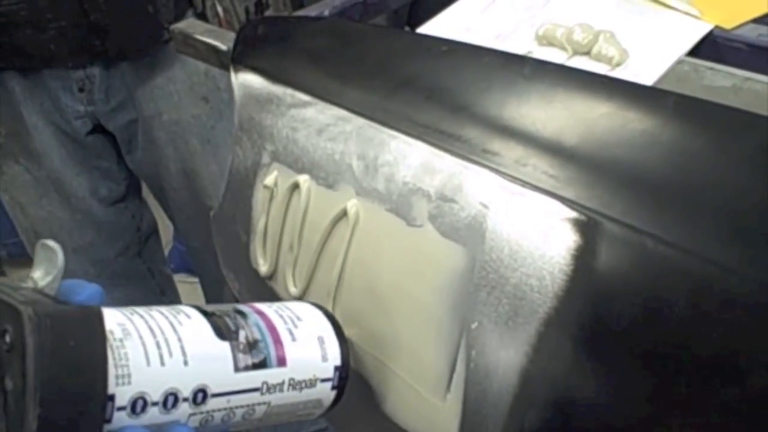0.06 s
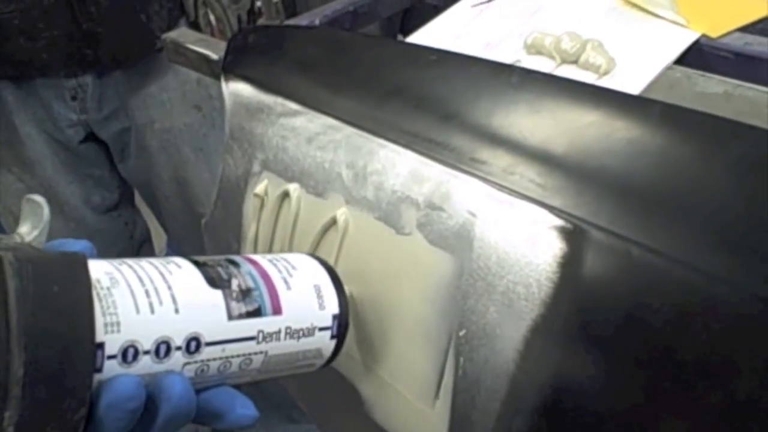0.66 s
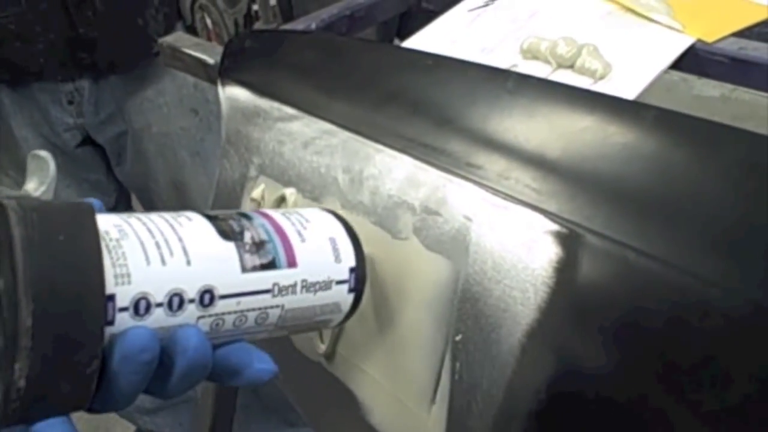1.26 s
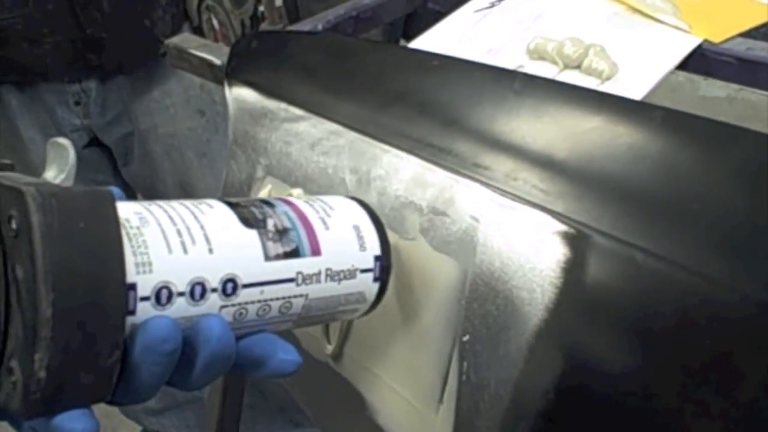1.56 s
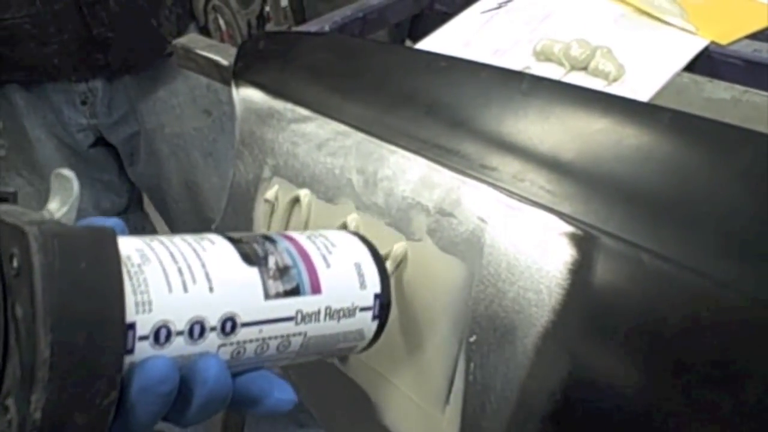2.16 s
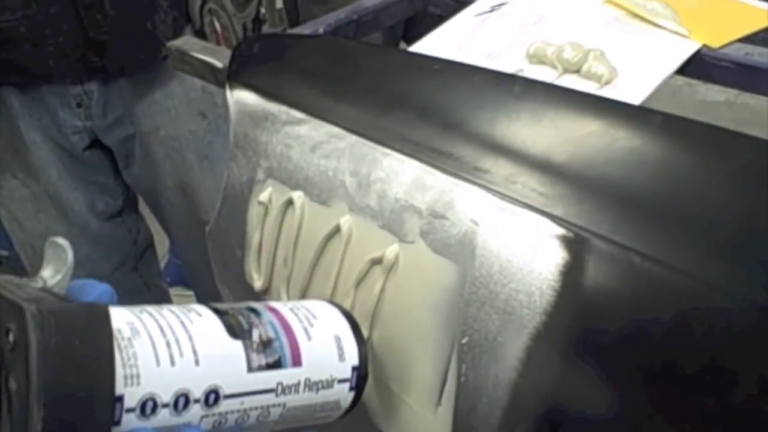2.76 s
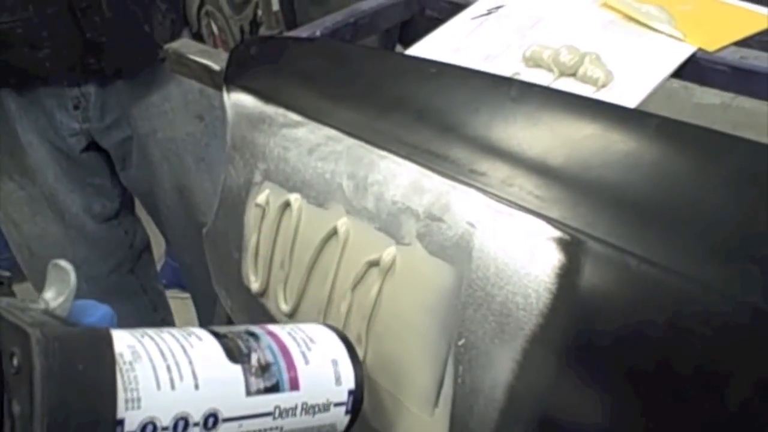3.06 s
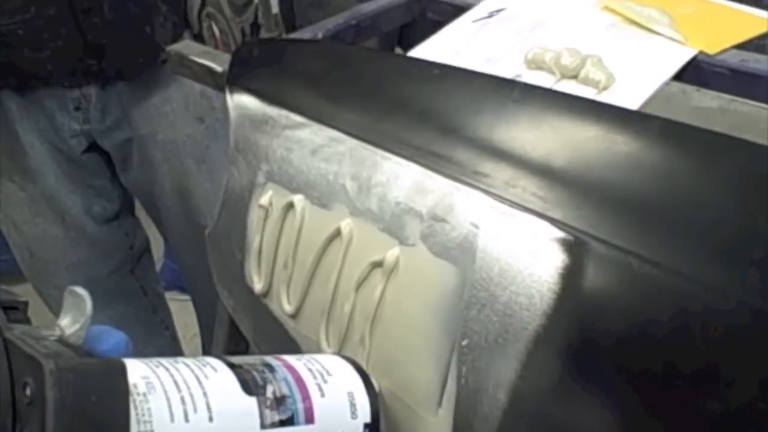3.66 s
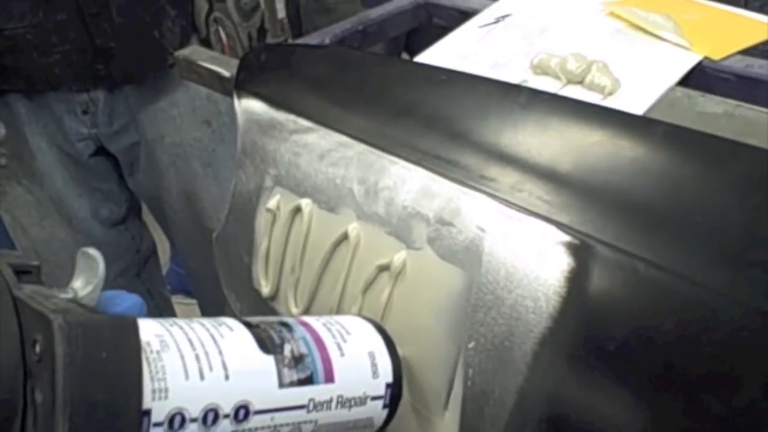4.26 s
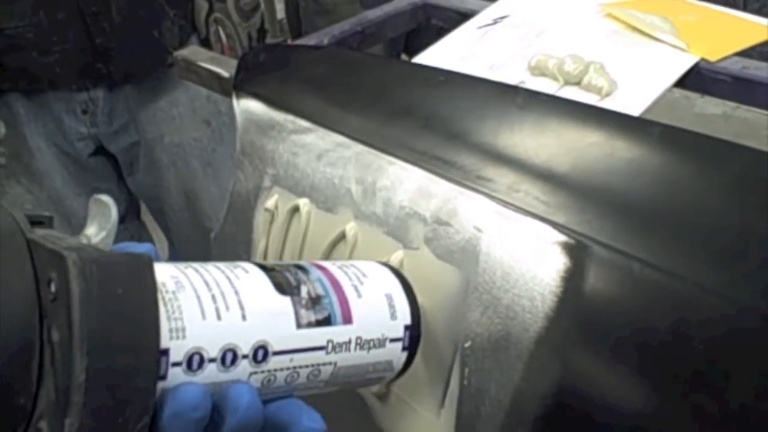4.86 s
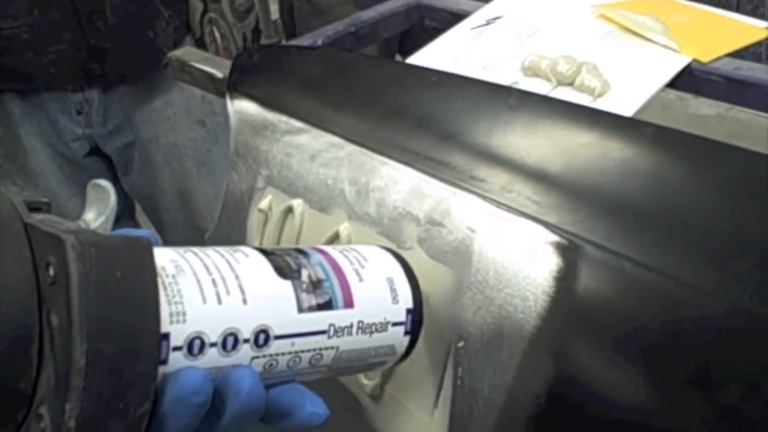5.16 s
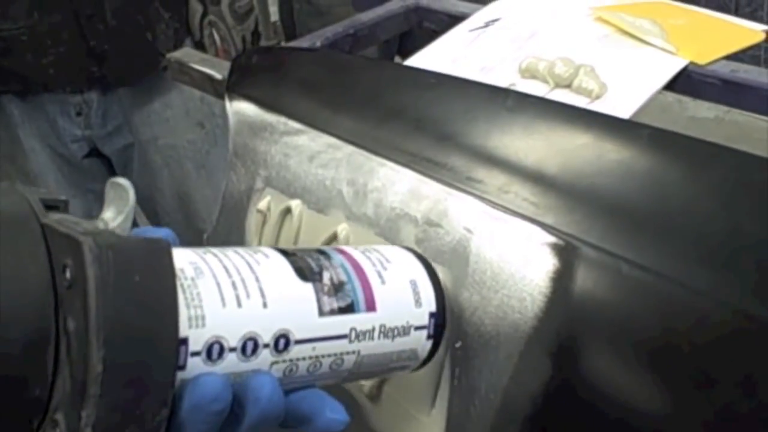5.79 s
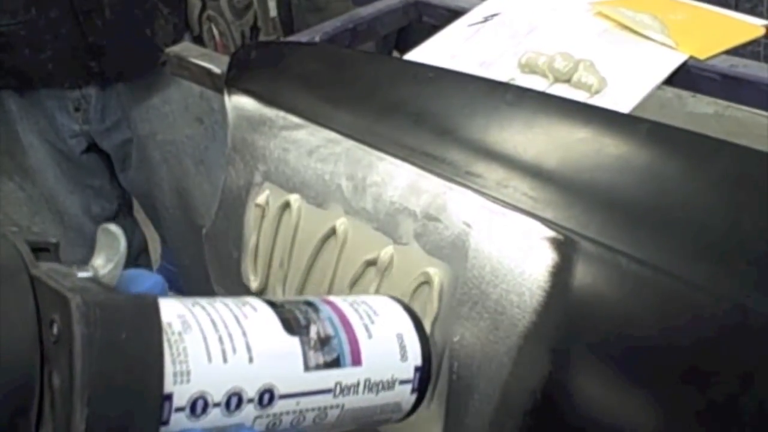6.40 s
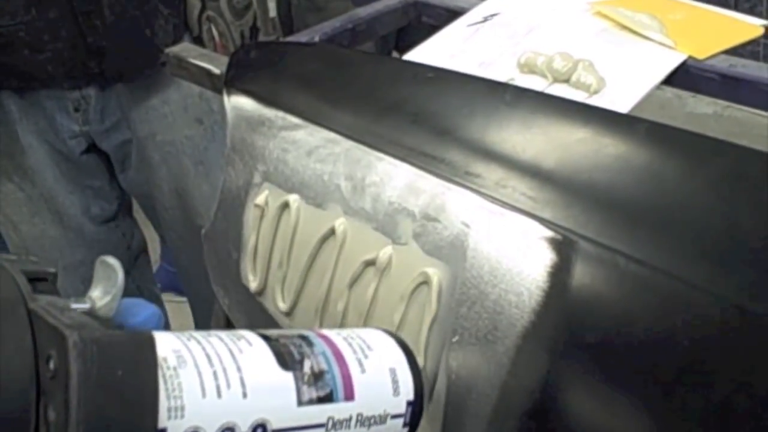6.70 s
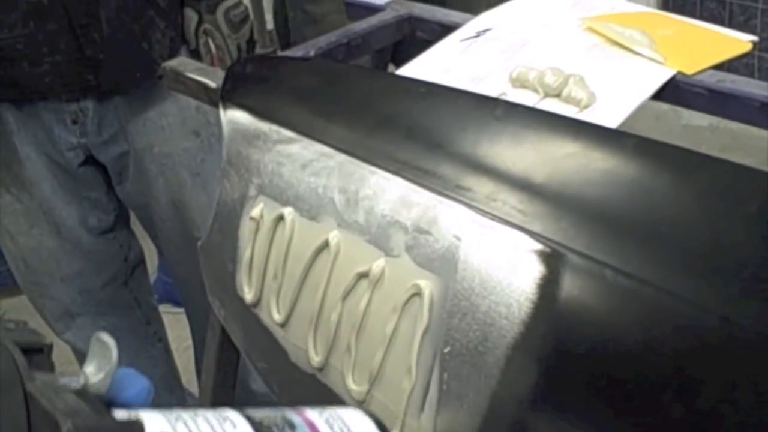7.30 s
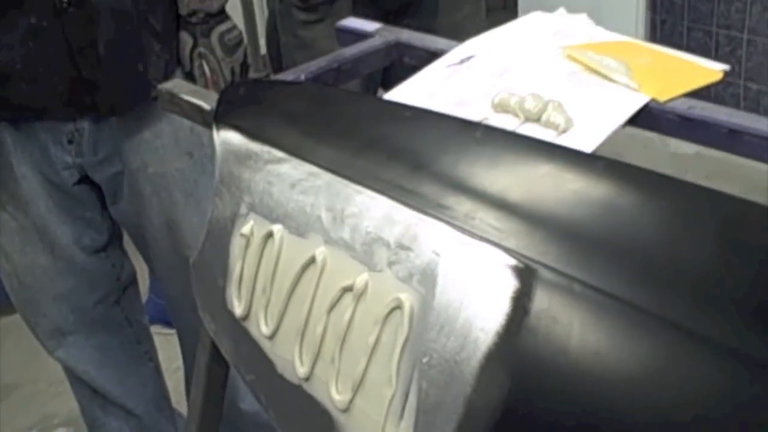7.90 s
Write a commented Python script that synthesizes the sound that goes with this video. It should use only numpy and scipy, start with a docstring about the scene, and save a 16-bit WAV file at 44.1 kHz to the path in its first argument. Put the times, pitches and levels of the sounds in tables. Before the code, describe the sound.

A close, continuous rush of air and an even whine come from a pneumatic gun spreading filler on a car panel. The tone of the hiss changes gently as the tool moves. After about seven seconds it shuts off with a thump, a short vent of air and a quick falling rattle, leaving a faint bump of a hand and the quiet background of a workshop.

```python
"""A bright, steady hiss with a whine inside it: an air-powered filler gun, close by, sweeping a car panel.
The hiss is exhaust air, changing colour as the gun turns; the whine is its vane motor and reduction gear.
Near the end the trigger is let go: the valve thumps shut, trapped air escapes and the vanes rattle
and hum as they spin down. One soft thump of the hand follows, over the quiet tone of the workshop."""
import sys
import numpy as np
from scipy import signal
from scipy.fft import rfft, irfft
from scipy.io import wavfile
from scipy.ndimage import uniform_filter1d

SR = 44100
rng = np.random.default_rng(int(sys.argv[2]) if len(sys.argv) > 2 else 0)


def log_audio(samples):
    """Write samples as a 16-bit WAV file to the path given in sys.argv[1]."""
    # one column per channel
    frames = np.atleast_2d(samples).T
    # limit to full scale, then quantise
    limited = np.clip(frames, -1, 1)
    pcm = np.round(limited * 32767).astype(np.int16)
    wavfile.write(sys.argv[1], SR, pcm)


N = 350152
TIME = np.arange(N) / SR
BINS = np.fft.rfftfreq(2048, 1 / SR)  # Hz
FRAMES = np.arange(N // 512 + 3) * 512 / SR  # seconds

# The gun's path over the panel. Each row: time in seconds, lift (negative is low, positive high),
# reach (negative is left, positive right).
GUN_PATH = [(0, -0.69, -2.6), (.3, -0.63, -2.4), (1, -0.093, -2.1), (1.4, 0.74, -0.59), (1.8, 1, 0.47),
            (2.3, 0.5, -0.56), (2.7, -.4, -0.17), (3.1, -0.94, -1.05), (3.8, -0.82, -0.32),
            (4.1, -0.47, 0.33), (4.6, 0.071, 1), (5, 0.47, 0.67), (5.8, 0.7, 0.92), (6.3, .25, 0.98),
            (6.9, -0.5, 0.96), (7.4, -0.78, 0.41)]
VANE_ORDER = 40  # air puffs per turn of the output shaft
RELEASE_S, SHUT_S = 7.388, 7.424  # the trigger is let go, then the valve snaps shut


def exhaust(turns, air_db=-15.5, vent_db=-21.5, split_hz=4500):
    """Turbulent air hisses out, throbbing with each shaft turn; trapped air vents once the valve shuts."""
    air = amp(air_db) * air_flow() + after_shut(vent_db, t60_s=.17, rise_s=.004, bend=1.23)
    jet = coloured_noise(exhaust_colour())
    body = signal.sosfiltfilt(signal.butter(2, split_hz, fs=SR, output='sos'), jet)
    gear_ripple = .055 * np.sin(2 * np.pi * 42 * turns)  # the teeth ripple the body of the hiss
    flutter = .07 * band_noise(590, 32)  # the lowest pipe resonance shakes the treble
    sizzle = (jet - body) * (1 + flutter + .13 * spits())
    hiss = body * (1 + gear_ripple) + sizzle
    throb = .051 * sum(np.cos(2 * np.pi * (k * turns + rng.random())) / np.sqrt(k) for k in range(1, 6))
    gusts = .046 * band_noise(0, 45)
    return air * hiss * (1 + throb + gusts)


def exhaust_colour(ripple_db=1.1):
    """The jet's spectrum, frame by frame, through resonances that swell and fade as the gun turns."""
    # The bare jet. Each row: frequency in Hz, relative level in dB.
    jet_spectrum = [(15, -86), (38, -67.5), (60, -79), (150, -75.5), (420, -73), (525, -69.5), (565, -63.5),
                    (1000, -64.5), (1400, -56), (3000, -56.5), (8000, -59), (14000, -61), (15600, -63.5)]
    # Peaks and dips of the housing and the panel beside it. Each row: centre in Hz, half width in Hz,
    # gain in dB, added dB per unit of lift, added dB per unit of reach.
    resonances = [(586, 14, 6, 1, 1.4), (784, 26, -1, 0, -0.5), (883, 40, 6.5, 0.5, 0),
                  (1190, 41, 0, -0.5, -1.5), (1403, 25, -6.5, 7.5, -3), (1760, 65, 2.4, -.8, -0.2),
                  (2080, 133, -5, -2, -1), (2320, 43, 1.5, 3, 0.7), (2430, 42, -3.5, 4.5, -1.5),
                  (2624, 53, 3.5, 2, 0.5), (2890, 70, 1.5, 1, 0.5), (3280, 140, -4, 0, -1.8),
                  (3460, 105, 0.5, -4, 1.3), (3800, 144, -2, 0.3, -0.8), (4290, 130, 1.5, 0.2, -1),
                  (4460, 28, -0.5, 0.5, 4.8), (5020, 69, 2.7, -4, 0), (5105, 51, -8.5, -1.5, -1.5),
                  (5820, 72, 0.7, 2, -0.4), (6070, 130, -1, 5, -.5), (6490, 90, 2, 4.5, -0.5),
                  (6710, 91, -6, -2, -2.5), (6930, 190, 2.2, 0, 0.5), (7620, 198, -1, 2, 0.2),
                  (8194, 200, -3, -1, .3), (9600, 270, 2.5, -1, 1), (11340, 160, -3, 2.5, -0.5),
                  (12430, 350, 2.5, -2, -0.3), (13440, 220, 3.5, 1, 2), (14400, 280, 1.5, 0.5, -1.5),
                  (15450, 250, 1, 1, 1)]
    lift, reach = follow(GUN_PATH, FRAMES[:, None])
    colour_db = across(jet_spectrum, BINS)
    for hz, width, db, lift_db, reach_db in resonances:
        colour_db = colour_db + (db + lift_db * lift + reach_db * reach) * bell(BINS, hz, width)
    # Small random ripples drift through the colour above 1 kHz.
    ripples = uniform_filter1d(rng.standard_normal(colour_db.shape), size=45, axis=0)
    ripples = unit(uniform_filter1d(ripples, size=5, axis=1))
    return colour_db + ripple_db * ripples * (BINS > 1000)


def spits(per_s=500, fade_s=.00018):
    """Tiny random bursts in the flow give it a fine grain: an envelope of mean 0 and rms 1."""
    sizes = rng.uniform(.5, 1, N) * (rng.random(N) < per_s / SR)
    bursts = signal.lfilter([1], [1, -np.exp(-1 / (fade_s * SR))], sizes)
    return unit(bursts - bursts.mean())


def air_flow(t60_s=.19, bend=1.61):
    """Gain of the air supply: full while the trigger is held, then choked ever faster."""
    return amp(-60 * (since_release() / t60_s) ** bend)


def motor(turns, whine_db=-30.5, fall_db_per_s=900, waver_hz=10):
    """The vanes sing one strong note that follows the gun's aim; rotor and gears add faint overtones."""
    # Tones of the rotor (multiples of 8), vanes (of 40) and gear teeth (of 21), with sidebands. Each
    # row: multiple of the shaft's speed, level in dB at full air, added dB per unit of reach.
    machine_tones = [(8, -52.5, .5), (21, -51, 0), (24, -51, 0), (32, -47, 1), (41, -49, 0),
                     (42, -45.5, -2), (45, -47, 2), (48, -47.5, 0), (56, -48, 0), (58, -47, 1),
                     (80, -42, 2), (81, -47, 0), (83, -46, 0), (84, -40, 0), (104, -47.5, -2),
                     (120, -42.5, 3.5), (160, -40.5, 3), (168, -47, 0), (176, -47, 0), (200, -47, 0)]
    lift, reach = follow(GUN_PATH, TIME)
    vane_db = whine_db + 1.3 * lift + 1.5 * reach - fall_db_per_s * since_release()
    vane_gain = amp(vane_db + .3 * band_noise(0, waver_hz)) + coasting_hum()
    whine = vane_gain * np.sin(2 * np.pi * VANE_ORDER * turns)
    flow = air_flow()
    for order, db, reach_db in machine_tones:
        level_db = db + reach_db * reach + 2 * band_noise(0, waver_hz)
        whine += flow * amp(level_db) * np.sin(2 * np.pi * (order * turns + rng.random()))
    return np.sqrt(2) * whine


def puff_rate(coast_s=.056):
    """The vanes' air puffs per second: creeping up as filler flows, coasting to a stop without air."""
    # The motor's pitch under power. Each row: time in seconds, puff rate in Hz.
    motor_pitch = [(0, 1082), (.3, 1088), (1.05, 1094), (1.85, 1111), (2.15, 1109), (3.3, 1118),
                   (4.2, 1120), (4.31, 1129.5), (7.3, 1125.5)]
    return follow(motor_pitch, TIME)[0] * np.exp(-since_release() / coast_s)


def shaft_turns(jitter=.00249, jitter_hz=45):
    """Running count of the output shaft's turns; the load makes its speed tremble."""
    turns_per_s = puff_rate() / VANE_ORDER * (1 + jitter * band_noise(0, jitter_hz))
    return np.cumsum(turns_per_s) / SR


def thumps(tick_width_s=.009, tick_width_hz=1600):
    """The closing valve, then the hand: each is one low swing of pressure with a short bright tick."""
    # Each row: centre time in seconds, peak in dB, seconds from centre to peak, tick level in dB,
    # tick frequency in Hz.
    hits = [(7.425, -25, 0.0013, -24, 14800), (7.868, -46, .0015, -55, 14600)]
    out = np.zeros(N)
    for at_s, db, swing_s, tick_db, tick_hz in hits:
        swing = (TIME - at_s) / swing_s
        out += amp(db) * swing * np.exp((1 - swing ** 2) / 2)
        out += amp(tick_db) * band_noise(tick_hz, tick_width_hz) * bell(TIME, at_s, tick_width_s)
    return out


def vane_rattle(turns, level_db=-30, fade_cycles=.28):
    """No longer pressed out by air, each slowing vane knocks the housing, which rings until the next."""
    # The ring of the motor housing. Each row: centre in Hz, half width in Hz, relative level in dB.
    housing_modes = [(1250, 490, -1), (3000, 350, 1), (4860, 550, 2.5)]
    knocks = unit(np.exp(-(VANE_ORDER * turns % 1) / fade_cycles))
    ring = unit(sum(amp(db) * band_noise(hz, width) for hz, width, db in housing_modes))
    return after_shut(level_db, t60_s=.23, rise_s=.013, bend=1.9) * knocks * ring


def coasting_hum(level_db=-40.5, boom_db=10, boom_hz=373, boom_width_hz=39):
    """Gain of the vanes' falling note after the valve shuts; it booms on passing the body's resonance."""
    boom = amp(boom_db * bell(puff_rate(), boom_hz, boom_width_hz))
    return after_shut(level_db, t60_s=.16, rise_s=.02, bend=1.5) * boom


def workshop_echo(x):
    """The workshop's diffuse echo, each band dying at its own speed."""
    # Each row: frequency in Hz, seconds to fall 60 dB.
    decay_times = [(100, .6), (1000, 0.83), (3000, 0.99), (5500, 1.07), (8000, 0.77), (15000, 0.59)]
    hz, t, noise = signal.stft(rng.standard_normal(SR), SR, nperseg=256)
    decay = amp(-60 * t / across(decay_times, hz)[:, None])
    tail = signal.istft(noise * decay, SR, nperseg=256)[1]
    return signal.fftconvolve(x, tail / np.linalg.norm(tail))[:N]


def room_tone():
    """The workshop's steady background: a low rumble under a thin hiss."""
    # Each row: frequency in Hz, relative level in dB.
    room_spectrum = [(15, -14), (30, 1), (77, -4), (170, -5.5), (270, -13), (420, -23), (1200, -27),
                     (2850, -24.5), (5400, -24), (8300, -31), (12000, -26), (15500, -22)]
    return coloured_noise(across(room_spectrum, BINS))


def since_release():
    """Seconds since the trigger was let go."""
    return np.maximum(TIME - RELEASE_S, 0)


def after_shut(db, t60_s, rise_s, bend):
    """Envelope that rises when the valve shuts, then dies away; a bend over 1 makes it linger first."""
    age = np.maximum(TIME - SHUT_S, 0)
    return np.minimum(age / rise_s, 1) * amp(db - 60 * (age / t60_s) ** bend)


def amp(db):
    """Decibels to gain."""
    return 10 ** (np.asarray(db) / 20)


def unit(x):
    """Scales to rms 1."""
    return x / np.sqrt(np.mean(x ** 2) + 1e-20)


def bell(x, centre, width):
    """A bell curve of height 1."""
    return np.exp(-.5 * ((x - centre) / width) ** 2)


def follow(rows, t):
    """The columns of a curve at the times t."""
    times, *columns = np.transpose(rows)
    return [np.interp(t, times, column) for column in columns]


def across(points, hz):
    """Reads a curve on a log-frequency axis."""
    freqs, values = np.transpose(points)
    return np.interp(np.log(hz + 1), np.log(freqs), values)


def band_noise(centre_hz, width_hz):
    """Noise of rms 1 in one bell-shaped band; around 0 Hz it is a slow random drift."""
    band = bell(np.fft.rfftfreq(N, 1 / SR), centre_hz, width_hz)
    return unit(irfft(rfft(rng.standard_normal(N)) * band, N))


def coloured_noise(colour_db):
    """Noise of rms 1 that follows a spectrum, steady or given frame by frame."""
    real, imag = rng.standard_normal((2, len(FRAMES), len(BINS)))
    spectra = (real + 1j * imag) * amp(colour_db)
    return unit(signal.istft(spectra.T, nperseg=2048, noverlap=1536)[1][:N])


def scene(echo_db=-25, room_db=-54):
    """The close gun, its faint echo and the room tone, the same in both ears."""
    turns = shaft_turns()
    gun = motor(turns) + exhaust(turns) + vane_rattle(turns) + thumps()
    mono = gun + amp(echo_db) * workshop_echo(gun) + amp(room_db) * room_tone()
    return np.array([mono, mono])


def record(dry):
    """A steep low-pass takes off the very top of the treble."""
    cutoff_hz = 15770
    taps = signal.firwin(2001, cutoff_hz, window=('kaiser', 9), fs=SR)
    return signal.oaconvolve(dry, taps[None], 'same', axes=1)


dry = scene()
out = record(dry)
log_audio(out)
```